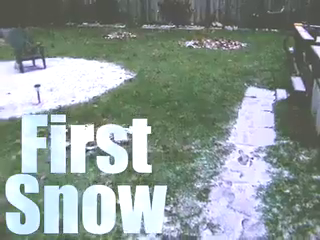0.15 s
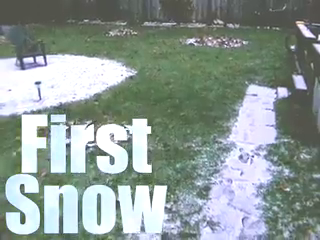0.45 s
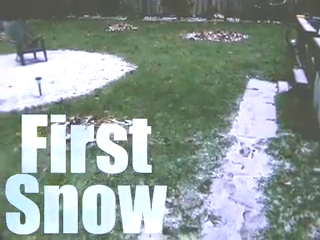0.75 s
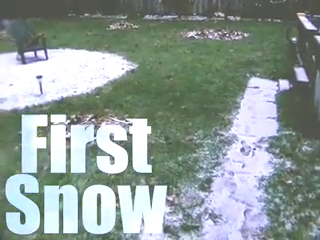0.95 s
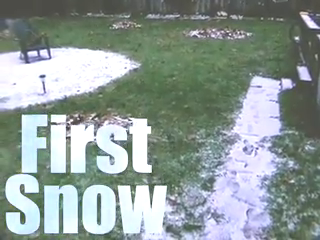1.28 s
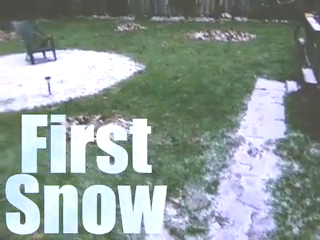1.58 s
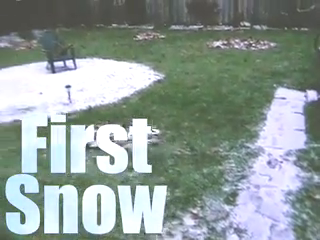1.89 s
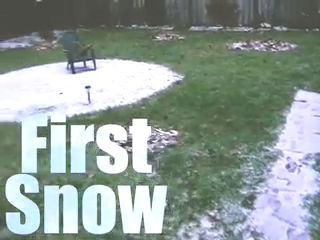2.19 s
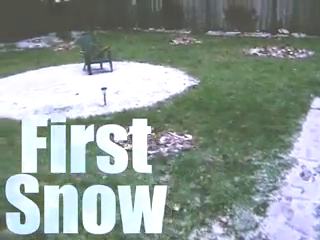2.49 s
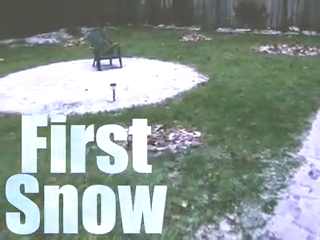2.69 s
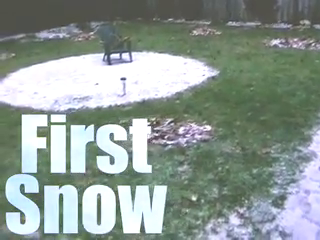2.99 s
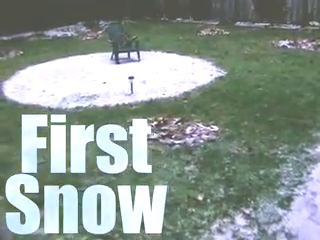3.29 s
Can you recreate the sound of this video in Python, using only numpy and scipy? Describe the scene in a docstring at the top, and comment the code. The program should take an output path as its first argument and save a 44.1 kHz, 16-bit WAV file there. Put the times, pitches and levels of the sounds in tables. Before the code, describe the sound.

Freezing rain and ice pellets patter on a frosty lawn in a steady, bright hiss. Nearby pellets tick sharply and crackle on frozen leaves, while distant traffic and a faint engine hum low underneath.

```python
"""Freezing rain and ice pellets patter on a frosted lawn: thousands of tiny impacts a second
over a smooth, far wash of noise. Distant traffic rumbles and an engine hums. A few near pellets
tick sharply and knock what they land on, and brief crackling spatters make frozen leaves ring.
The small camera that hears it all fades in and has a narrow notch in its treble."""
import sys
import numpy as np
from scipy import signal
from scipy.fft import rfft, irfft, next_fast_len
from scipy.io import wavfile
from scipy.ndimage import map_coordinates

SR = 44100
rng = np.random.default_rng(int(sys.argv[2]) if len(sys.argv) > 2 else 0)


def pcm_store(signal):
    """Save signal as 16-bit PCM."""
    levels = np.round(np.clip(np.atleast_2d(signal), -1, 1) * 32767)
    wavfile.write(sys.argv[1], SR, levels.astype(np.int16).T)


N = 152145

# how hard the sleet falls (time [s], relative level [dB])
FALL_STRENGTH = [(.09, -30.5), (.3, -30.5), (.62, -29.5), (.9, -28.5), (1.02, -27.5), (1.18, -28.5),
                 (1.45, -28), (1.7, -28), (2.0, -29), (2.25, -30), (2.38, -29.5), (2.52, -31), (2.66, -29),
                 (2.85, -30), (3.1, -31.5), (3.45, -31.5)]
# tone colour of the small impacts (frequency [Hz], relative level [dB])
PATTER_COLOUR = [(300, -38), (600, -22.5), (1200, -17), (1800, -16), (3000, -10.5), (4400, -6),
                 (6800, -3.5), (9500, -1), (12000, 2), (13500, 1)]
# tone colour of the far wash (frequency [Hz], relative level [dB])
WASH_COLOUR = [(250, -32), (400, -11), (650, -5), (1100, -0.5), (1700, -2.5), (3000, -1), (5000, 0.5),
               (7500, -1), (11500, 7.5), (13500, -0.5)]
# how alike left and right sound (frequency [Hz], correlation [-1 to 1])
STEREO_LIKENESS = [(50, 0.92), (500, 0.79), (1300, 0.84), (2000, 0.72), (3100, 0.17), (4700, 0.22),
                   (6300, -0.2), (10000, -0.45), (13000, 0.48)]
# tone colour of the traffic (frequency [Hz], relative level [dB])
TRAFFIC_COLOUR = [(20, -30), (40, -7), (65, -9), (85, -4.5), (108, 0), (150, -6), (205, -3), (240, -11.5),
                  (290, -13.5), (350, -28), (600, -48.5)]
# loudness of the traffic (time [s], level [dB])
TRAFFIC_LEVEL = [(0, -37.5), (.45, -36.3), (.85, -38.5), (1.3, -37.5), (1.46, -35.5), (1.6, -37),
                 (1.75, -35.7), (2.2, -36), (2.32, -38), (2.5, -37), (2.58, -34.5), (2.8, -33.5),
                 (3.05, -34.5), (3.45, -34)]
# the engine's lowest note (time [s], firing rate [Hz], level before ENGINE_GAIN_DB [dB])
ENGINE_NOTE = [(0.1, 51.8, -43), (0.53, 51.8, -47), (1.21, 53.3, -44), (1.5, 53.13, -46.5),
               (2.39, 54.6, -45), (2.62, 54.5, -42), (3.4, 54.6, -42.5)]
# the engine's note an octave higher (time [s], level [dB])
ENGINE_OCTAVE = [(0, -78), (.5, -35.5), (.9, -57), (1.4, -40), (1.7, -47), (2.1, -42.5), (2.6, -38.5),
                 (2.9, -60), (3.45, -68)]
# faint machines (pitch [Hz], starting level [dB], final level [dB])
MACHINE_HUMS = [(192.8, -51.5, -44.5), (495.7, -58, -74.5), (1103, -59, -55)]
# near pellets, before TICK_GAIN_DB
# (time [s], snap level [dB], knock level [dB], left minus right [dB], time to fade by 60 dB [s])
NEAR_PELLETS = [(.136, -19, -36, -8, .005), (.1382, -21, -39, 5, .005), (.158, -27, -38, -2, .003),
                (.1812, -17.5, -33, 1, .014), (.3387, -25, -38, 2, .003), (.3854, -26, -24, -1, .012),
                (.3871, -24, -25, 1, .012), (.3971, -17, -21, 7, .012), (.3987, -21, -22, 1, .012),
                (.4012, -23, -24, 3, .006), (.5342, -22, -31, 6, .008), (.6991, -24, -34, 6, .006),
                (.8276, -22, -28, 3, .006), (.8545, -27, -36, -4, .003), (.9456, -24, -35, 0, .003),
                (.9552, -24, -34, 8, .003), (1.0035, -23, -31, 1, .006), (1.0364, -21, -36, -9, .003),
                (1.2113, -21, -40, -7, .003), (1.2502, -20, -32, 9, .006), (1.2785, -22, -37, 8, .003),
                (1.4054, -25, -36, 6, .003), (1.4724, -21, -32, 5, .006), (1.5239, -23, -40, 9, .003),
                (1.5944, -22, -35, -9, .003), (1.7485, -19.5, -29, -7, .005), (1.7528, -22, -31, -2, .01),
                (1.7619, -26, -32, 9, .006), (1.8331, -23, -36, -8, .006), (1.8927, -24, -31, -1, .003),
                (1.9115, -17, -31, -2, .014), (1.949, -26, -40, -9, .003), (2.0368, -27, -37, 3, .003),
                (2.1105, -26, -30, -1, .006), (2.1715, -25, -39, -5, .003), (2.1917, -25, -38, 0, .003),
                (2.2306, -22.5, -38, 2, .006), (2.4437, -22, -30, -2, .006), (2.5929, -21, -32, 9, .014),
                (2.7514, -25, -39, 0, .006), (2.8124, -24, -34, -9, .006), (2.8251, -22, -33, 3, .003),
                (2.8486, -25, -33, -5, .003), (2.9521, -26, -34, 0, .003), (3.025, -22, -39, 1, .006),
                (3.2658, -23, -36, 3, .006)]
# tone colour of ice snapping nearby (frequency [Hz], relative level [dB])
ICE_COLOUR = [(500, -23), (1500, -11), (3000, -39), (5000, -15.5), (7000, 1.5), (9500, 1.5), (12000, 6),
              (13500, -1.5)]
# tone colour of what a near pellet lands on (frequency [Hz], relative level [dB])
KNOCK_COLOUR = [(300, -28), (700, -12), (1300, -5), (2500, -2), (3600, -3), (5000, 0), (7500, -8),
                (13000, -30)]
# ice on leaves
# (peak time [s], half-width [s], crackle level [dB], leaf pitch [Hz], leaf level [dB], sharpness [Q])
LEAF_SPATTERS = [(0.145, 0.008, -25, 3800, -29, 6), (0.184, 0.0032, -17, 5740, -20.5, 5),
                 (0.278, 0.021, -28, 4500, -34, 2), (0.389, 0.004, -30, 2700, -25, 3),
                 (0.392, 0.005, -40, 1400, -28, 3.5), (0.399, .006, -29, 2650, -23, 4),
                 (0.402, 0.005, -25, 5230, -24.5, 3), (0.459, 0.013, -32, 4500, -31, 2),
                 (0.707, .008, -25, 4432, -32, 3), (0.829, 0.005, -26, 2200, -36, 2),
                 (1.01, .025, -31, 4400, -31.5, 3), (1.254, 0.004, -23, 5040, -33, 2),
                 (1.503, 0.012, -36, 2050, -29.3, 1.6), (1.757, 0.011, -27, 4500, -33, 2),
                 (2.0, .025, -38, 4500, -33.5, 3), (2.097, 0.005, -29, 4720, -26.5, 4),
                 (2.112, 0.005, -29, 4720, -28, 4), (2.232, 0.005, -25, 4500, -38, 2),
                 (2.445, 0.012, -31, 3400, -35, 1.5), (2.597, 0.006, -24, 4500, -38, 3),
                 (3.285, 0.015, -26, 5000, -45, 3)]
# the camera fading in (time [s], gain [0 to 1])
CAMERA_FADE = [(.033, 0), (.036, 0.42), (.06, 0.58), (.085, 0.89)]

PELLETS_PER_S, SIZE_SPREAD_DB, BIGGEST_DB = 3400, 3.0, 5.5  # sizes compared with a typical pellet
CRACK_T60_S, NOTE_T60_S, NOTE_DB = 0.0067, 0.019, -9  # T60 is the time to fade by 60 dB
PATTER_DB, WASH_DB, FLURRY_DB = -24.5, -28, 1.38
FINE_ABOVE_HZ, FINE_FLURRY_DB = 8000, 0.7
ENGINE_GAIN_DB, TICK_GAIN_DB, STREET_LEFT_DB = 2, 24.5, 2.5
NOTCH_HZ, NOTCH_WIDTH_HZ, TOP_HZ = 7893, 1610, 13550
LEFT_LAG_S, LEFT_LOUDER_DB = .000025, .2


def amp(db):
    """Turn decibels into a gain."""
    return 10 ** (np.asarray(db) / 20)


def unit(x):
    """Scale x to an average power of 1."""
    return x / np.sqrt(np.mean(x ** 2) + 1e-20)


def along(points, hz):
    """Read a table at any frequency, on a logarithmic scale."""
    freqs, values = np.transpose(points)
    return np.interp(np.log(hz + 1), np.log(freqs + 1), values)


def curves(rows):
    """Give one value per sample for each column after the time."""
    times, *columns = np.transpose(rows)
    return [np.interp(np.arange(N) / SR, times, column) for column in columns]


def wobble(rate):
    """A smooth curve through `rate` random points a second."""
    points = rng.standard_normal(int(N * rate / SR) + 4)
    return map_coordinates(points, [np.arange(N) * rate / SR])


def pan(db):
    """Two gains that make the left louder than the right by db."""
    return amp(np.array([[db], [-db]]) / 2)


def filtered(x, response):
    """Multiply each frequency in x by response(hz)."""
    size = next_fast_len(N + SR // 2)
    return irfft(rfft(x, size) * response(np.fft.rfftfreq(size, 1 / SR)), size)[..., :N]


def stereo(pair, colour):
    """Colour two unrelated signals and blend them into left and right, at power 1."""
    def response(hz):
        angle = np.arccos(along(STEREO_LIKENESS, hz)) / 2
        return (hz < TOP_HZ) * amp(along(colour, hz)) * np.array([np.cos(angle), np.sin(angle)])
    shared, opposed = filtered(pair, response)
    return unit(np.array([shared + opposed, shared - opposed]))


def noise(colour):
    """Stereo noise with the given tone colour."""
    return stereo(rng.standard_normal((2, N)), colour)


def impact(t60, size=1024):
    """A struck surface rings briefly and densely, like a dying burst of noise."""
    ring = rng.standard_normal((2, size)) * amp(-60 * np.arange(size) / SR / t60)
    return ring / np.linalg.norm(ring)


def surface(size=1024):
    """One kind of surface answers a pellet with a crack and a faint note of random pitch."""
    t = np.arange(size) / SR
    hz, phase = rng.random() * TOP_HZ, rng.random((2, 1))
    note = np.sin(2 * np.pi * (hz * t + phase)) * amp(-60 * t / NOTE_T60_S)
    crack = impact(CRACK_T60_S * 2 ** rng.uniform(-1.23, 1), size)
    return crack + amp(NOTE_DB) * note / np.linalg.norm(note)


def pellets(surfaces):
    """Pellets of random size land at random times on many kinds of surface."""
    out = np.zeros((2, N))
    for _ in range(surfaces):
        lands = rng.random(N) < PELLETS_PER_S / surfaces / SR
        size = amp(np.minimum(SIZE_SPREAD_DB * rng.standard_normal(N), BIGGEST_DB))
        out += signal.oaconvolve((lands * size)[None], surface(), axes=1)[:, :N]
    return out


def sleet():
    """The harder the ice falls, the louder the near patter and the far wash."""
    fall_db, = curves(FALL_STRENGTH)
    swing_db = fall_db - fall_db.mean()
    flurry_db = FLURRY_DB * unit(wobble(14) + wobble(45))
    patter = stereo(pellets(surfaces=36), PATTER_COLOUR)
    # the finest, brightest pellets come in flurries of their own
    fine = filtered(patter, lambda hz: hz > FINE_ABOVE_HZ)
    fine_gain = amp(FINE_FLURRY_DB * unit(wobble(24.98) + wobble(250)))
    patter += fine * (fine_gain - 1)
    wash = amp(WASH_DB + swing_db / 2) * noise(WASH_COLOUR)
    return amp(PATTER_DB + swing_db + flurry_db) * patter + wash


def engine():
    """A far engine hums at its firing rate and an octave above, slowly speeding up."""
    firing_hz, note_db = curves(ENGINE_NOTE)
    octave_db, = curves(ENGINE_OCTAVE)
    cycles = np.cumsum(firing_hz) / SR
    out = np.zeros(N)
    for harmonic, db in ((1, note_db + ENGINE_GAIN_DB), (2, octave_db)):
        gain = amp(db + 1.1 * wobble(4.82))
        out += gain * np.sin(harmonic * (2 * np.pi * cycles + 0.22 * wobble(7.07)))
    return np.sqrt(2) * out  # this factor gives a sine wave a power of 1


def hums():
    """Machines hum faintly, wavering in loudness and pitch."""
    t, out = np.arange(N) / SR, np.zeros(N)
    for hz, first_db, last_db in MACHINE_HUMS:
        gain = amp(np.linspace(first_db, last_db, N) + 1.9 * wobble(4.86))
        out += gain * np.sin(2 * np.pi * hz * t + 0.7 * wobble(10))
    return np.sqrt(2) * out


def traffic():
    """Far traffic blurs into a low rumble that rises and falls."""
    level_db, = curves(TRAFFIC_LEVEL)
    return amp(level_db + 1.7 * wobble(6.0)) * noise(TRAFFIC_COLOUR)


def near_impact(t60, colour, margin):
    """One impact with a tone colour and `margin` extra samples at each end."""
    ring = np.pad(impact(t60), ((0, 0), (margin, margin)))
    hz = np.fft.rfftfreq(ring.shape[1], 1 / SR)
    ring = irfft(rfft(ring) * amp(along(colour, hz)) * (hz < TOP_HZ))
    return ring / np.linalg.norm(ring, axis=1, keepdims=True) / np.sqrt(2)


def ticks(margin=512):
    """Each near pellet snaps crisply and knocks what it lands on."""
    out = np.zeros((2, N + SR))
    for time, snap_db, knock_db, left_db, t60 in NEAR_PELLETS:
        snap = amp(snap_db) * near_impact(t60, ICE_COLOUR, margin)
        knock = amp(knock_db) * near_impact(t60, KNOCK_COLOUR, margin)[0]  # one wave for both sides
        hit = unit(pan(left_db)) * snap + unit(pan(left_db / 2)) * knock
        start = round(time * SR) - margin
        out[:, start:start + hit.shape[1]] += amp(TICK_GAIN_DB) * hit
    return out[:, :N]


def spatters():
    """Clumps of impacts swell and die in a moment, each ringing a frozen leaf."""
    t, clump = np.arange(N) / SR, pellets(surfaces=12)
    crackle = stereo(clump, ICE_COLOUR)
    uncoloured = stereo(clump, [(0, 0)])
    out = np.zeros((2, N))
    for time, width, crackle_db, leaf_hz, leaf_db, sharpness in LEAF_SPATTERS:
        resonance = signal.iirpeak(leaf_hz, sharpness, fs=SR)
        leaf = unit(signal.lfilter(*resonance, uncoloured))
        swell = np.exp(-.5 * ((t - time) / width) ** 2)
        out += swell * (amp(crackle_db) * crackle + amp(leaf_db) * leaf)
    return out


def scene():
    """Falling ice, with the distant street a little to the left."""
    ice = sleet() + ticks() + spatters()
    street = engine() + hums() + traffic()
    return ice + pan(STREET_LEFT_DB) * street


def record(dry):
    """The camera fades in, notches the treble and cuts the top; its left is a touch louder and later."""
    fade, = curves(CAMERA_FADE)
    faded = dry * fade * pan(LEFT_LOUDER_DB)
    delay_s = np.array([[LEFT_LAG_S], [-LEFT_LAG_S]]) / 2
    delayed = filtered(faded, lambda hz: np.exp(-2j * np.pi * hz * delay_s))
    notched = filtered(delayed, lambda hz: np.abs(hz - NOTCH_HZ) / np.hypot(hz - NOTCH_HZ, NOTCH_WIDTH_HZ))
    return filtered(notched, lambda hz: hz < TOP_HZ)


dry = scene()
out = record(dry)
pcm_store(out)
```